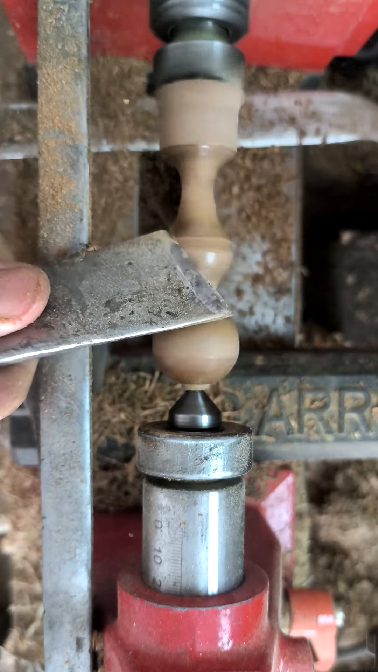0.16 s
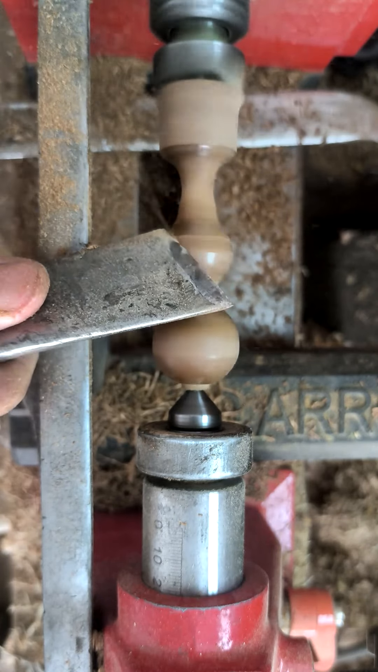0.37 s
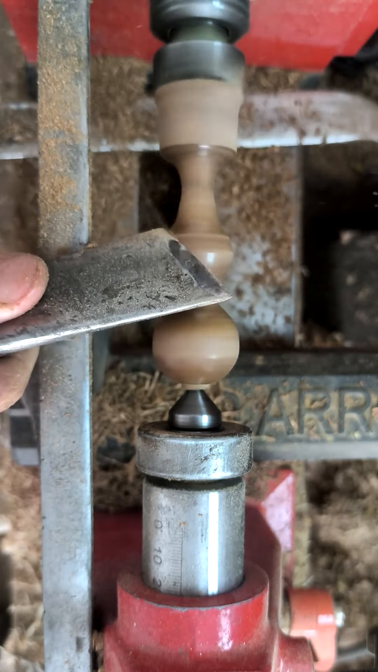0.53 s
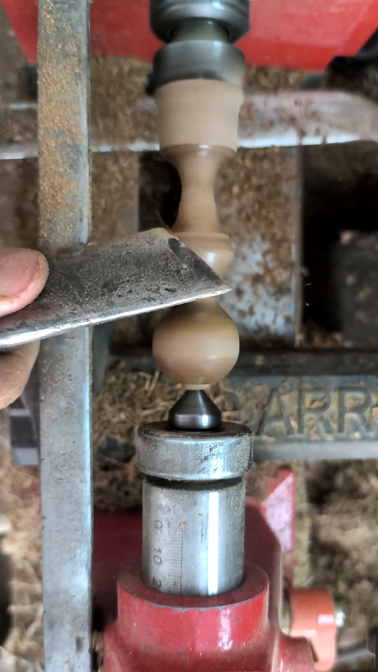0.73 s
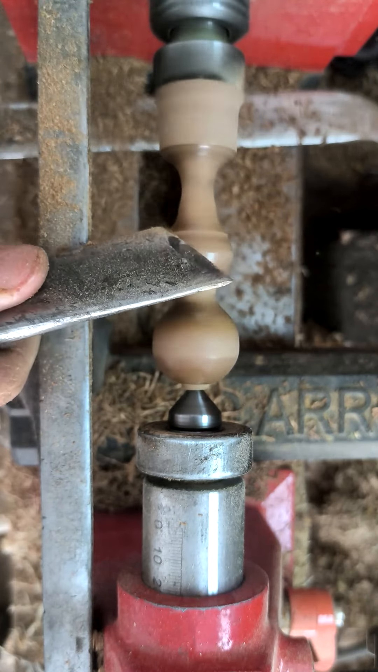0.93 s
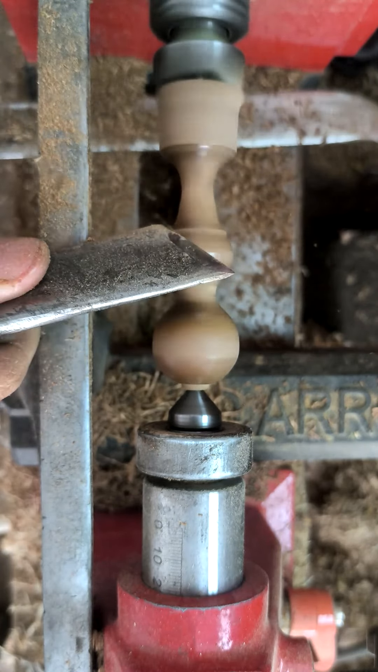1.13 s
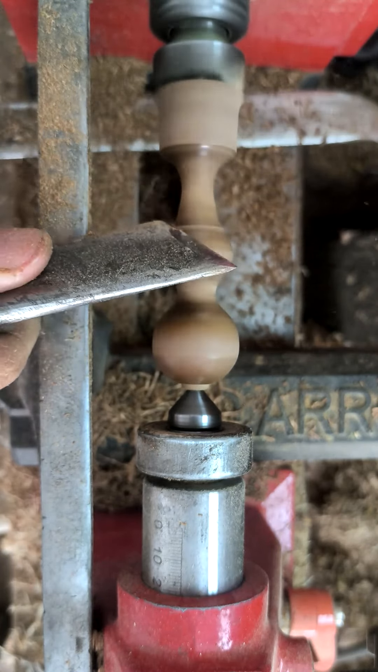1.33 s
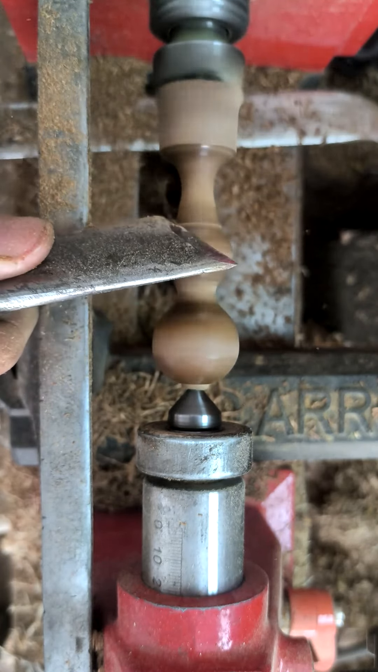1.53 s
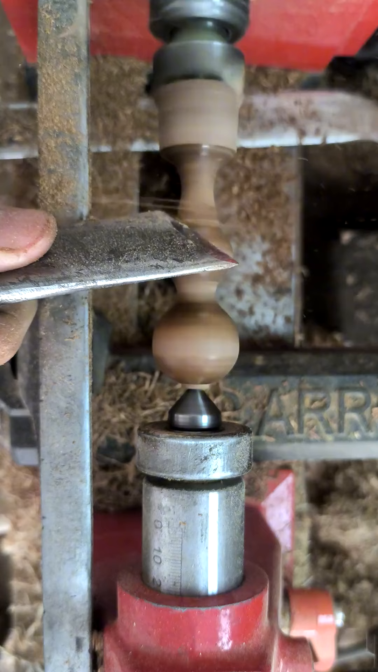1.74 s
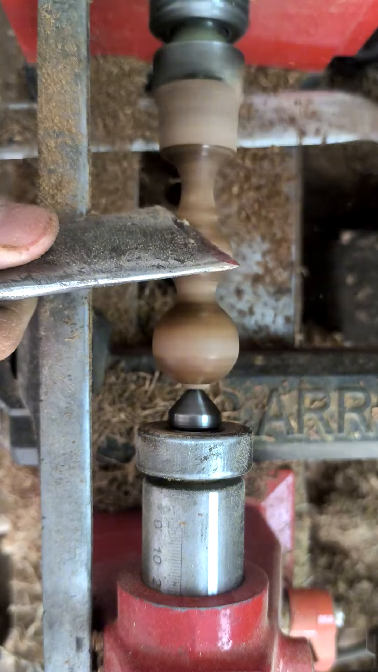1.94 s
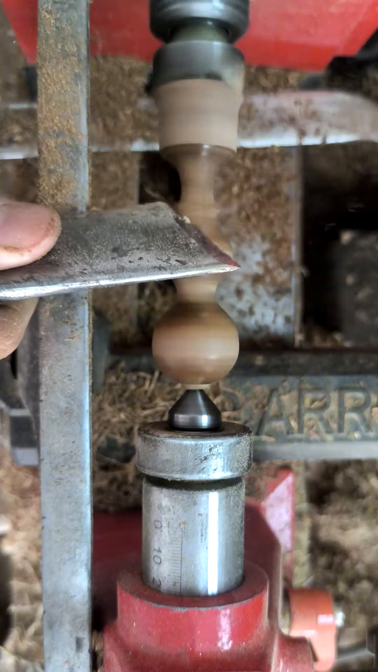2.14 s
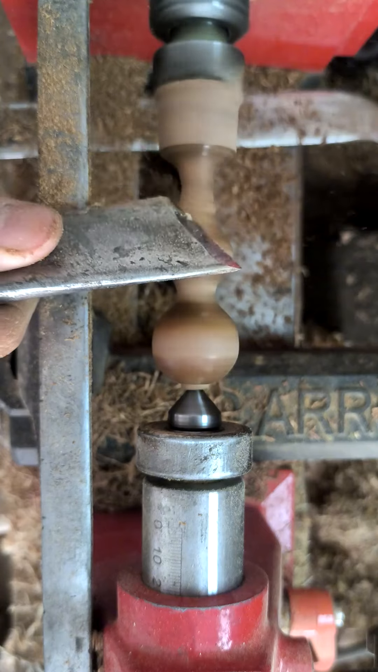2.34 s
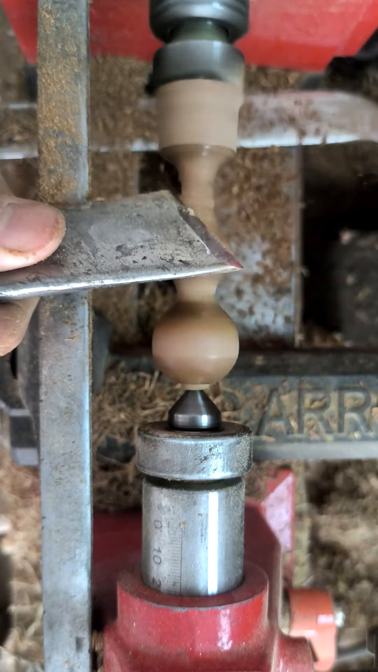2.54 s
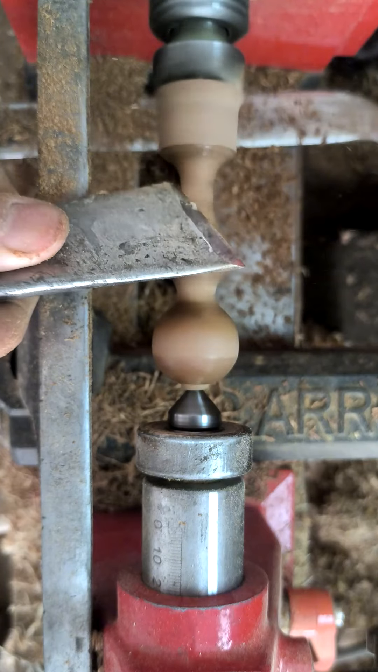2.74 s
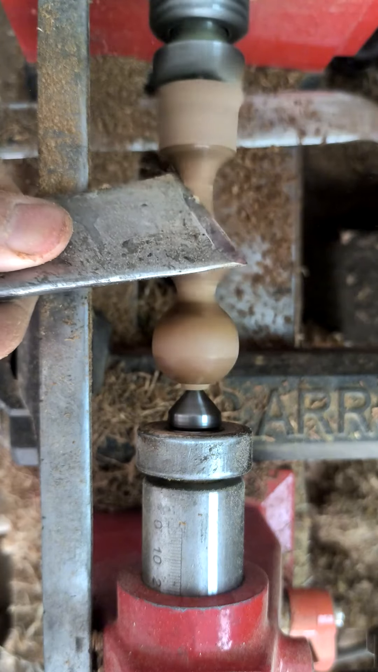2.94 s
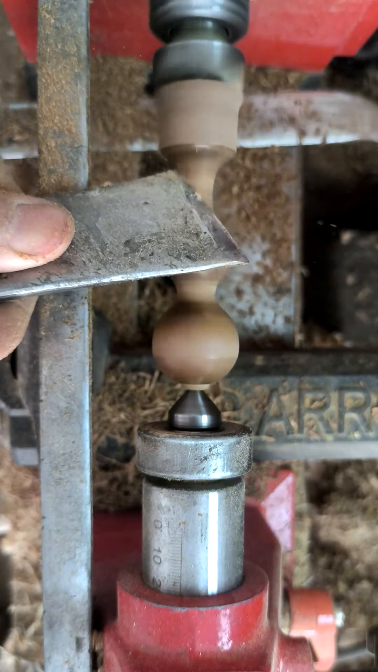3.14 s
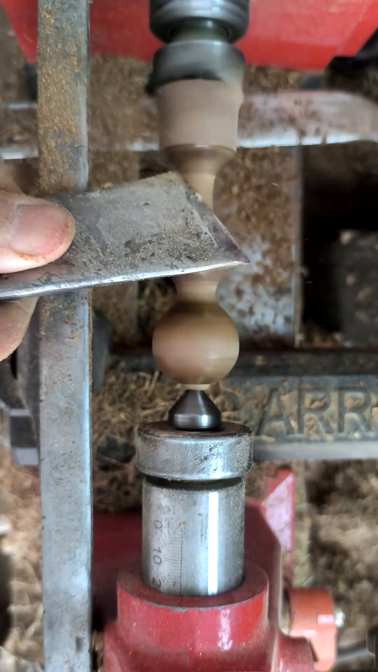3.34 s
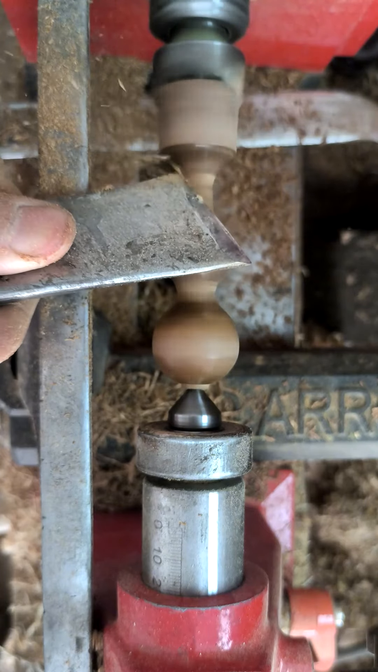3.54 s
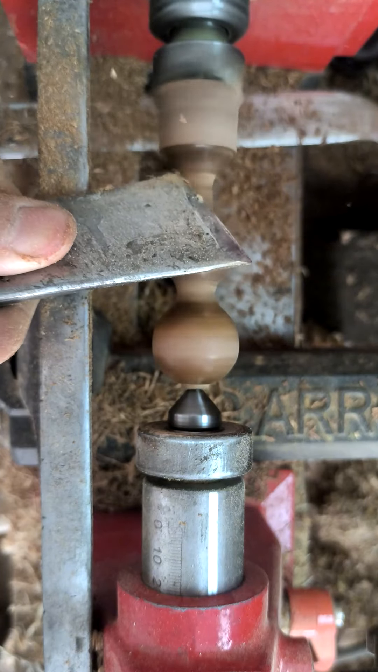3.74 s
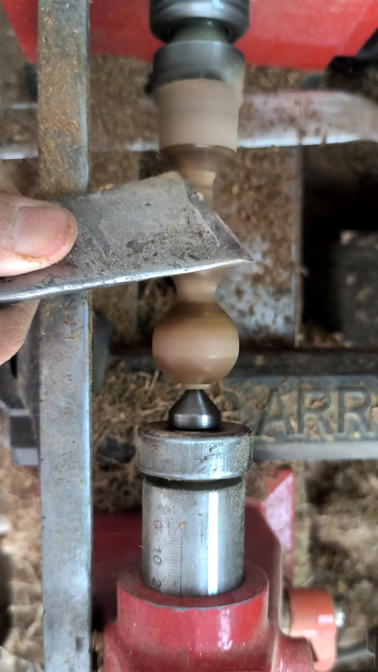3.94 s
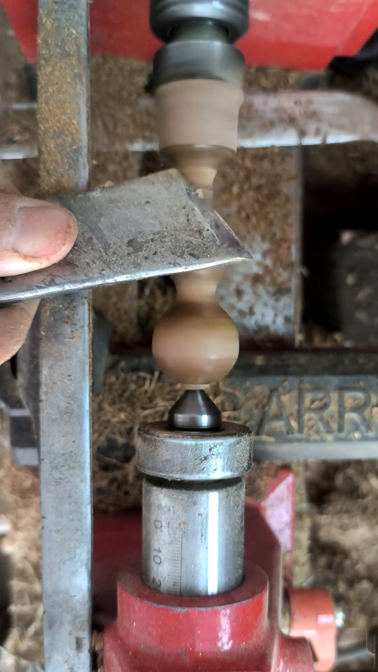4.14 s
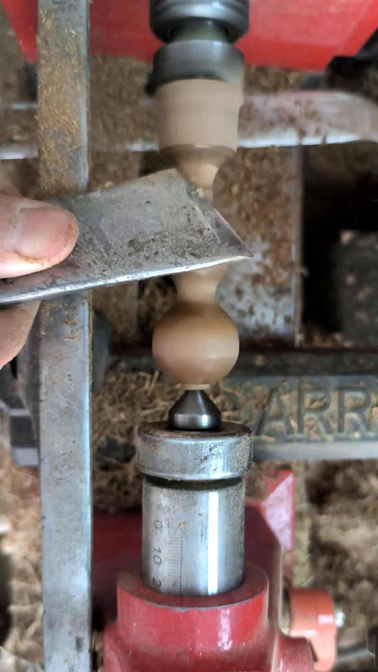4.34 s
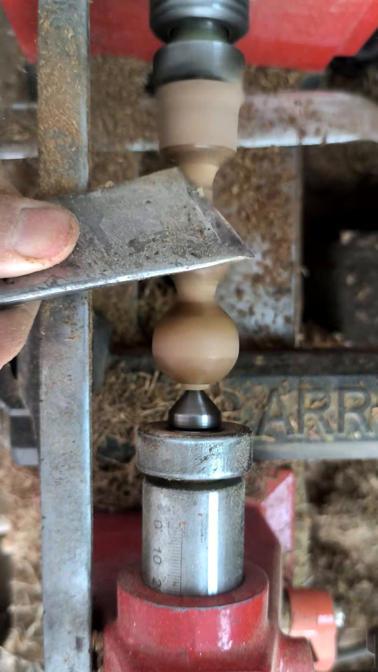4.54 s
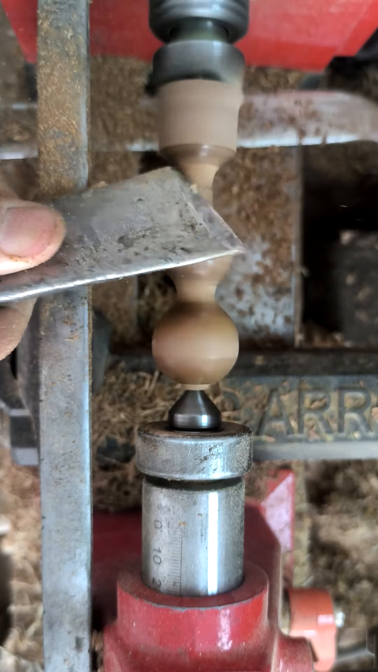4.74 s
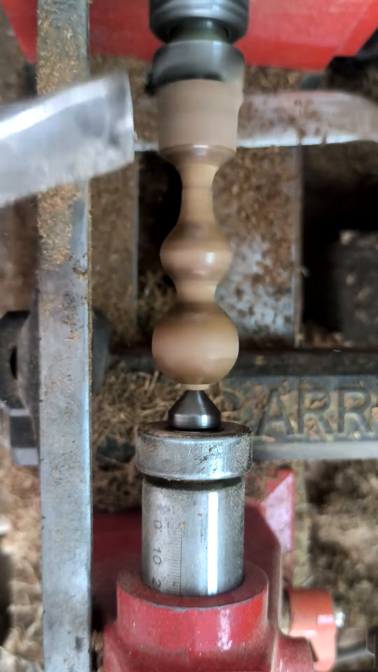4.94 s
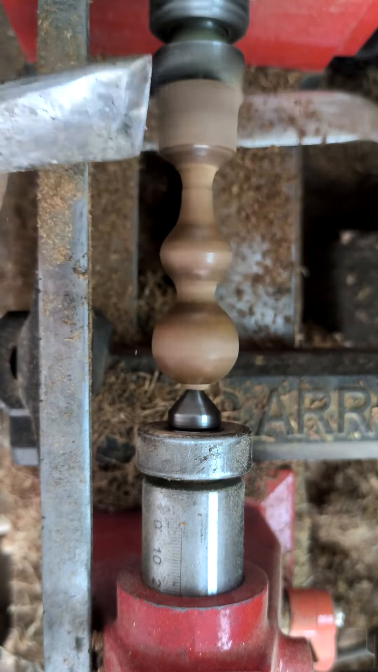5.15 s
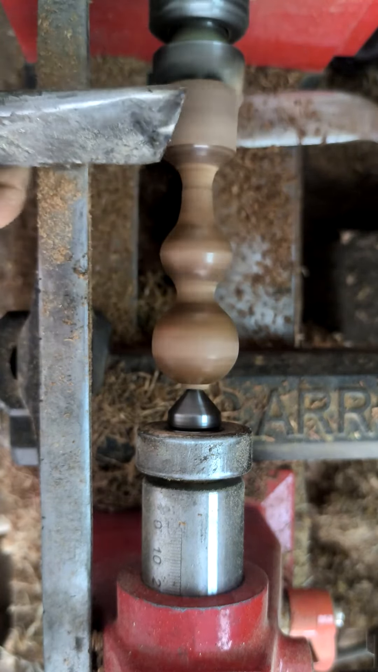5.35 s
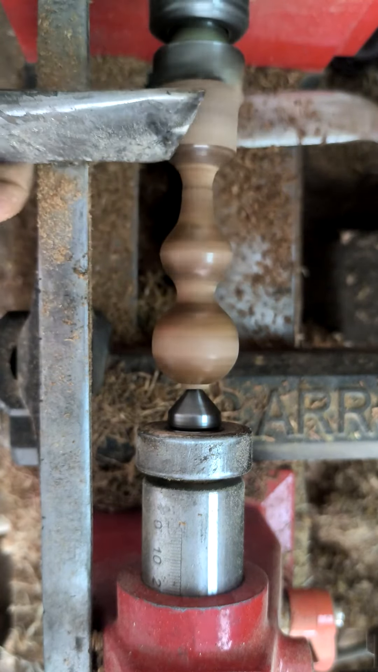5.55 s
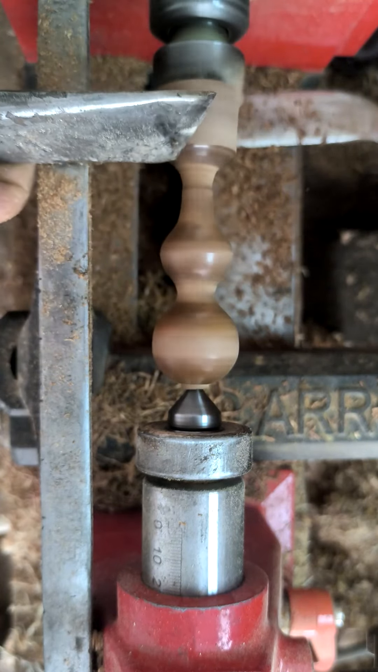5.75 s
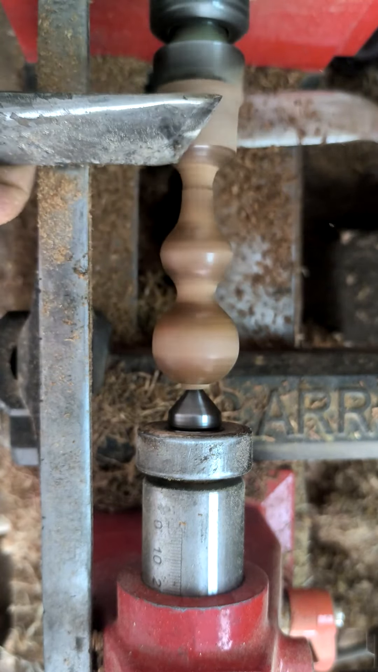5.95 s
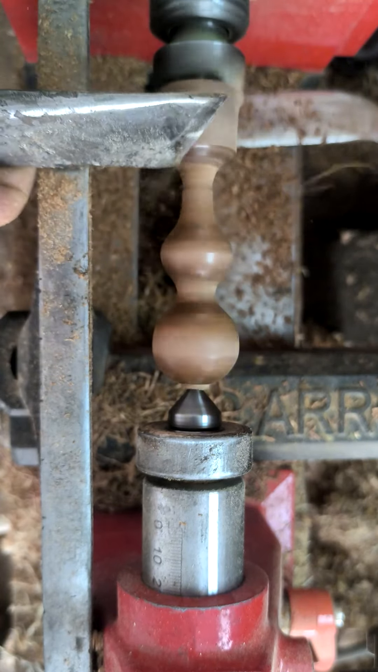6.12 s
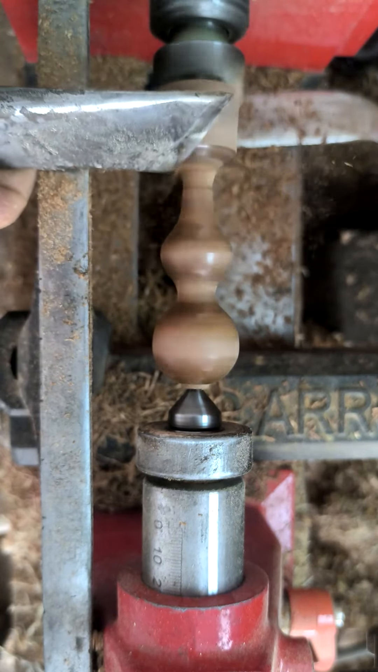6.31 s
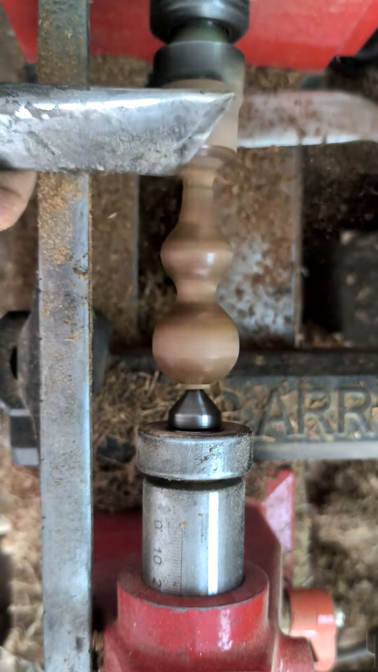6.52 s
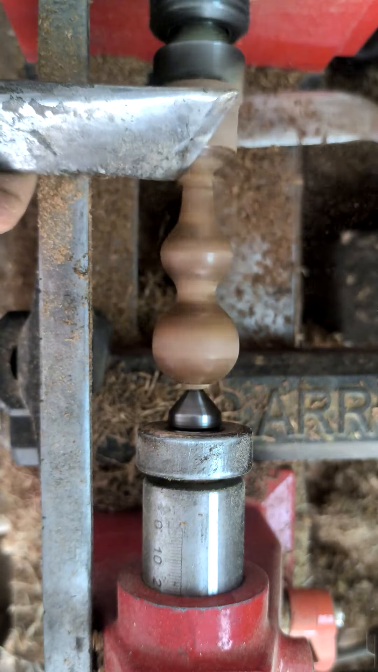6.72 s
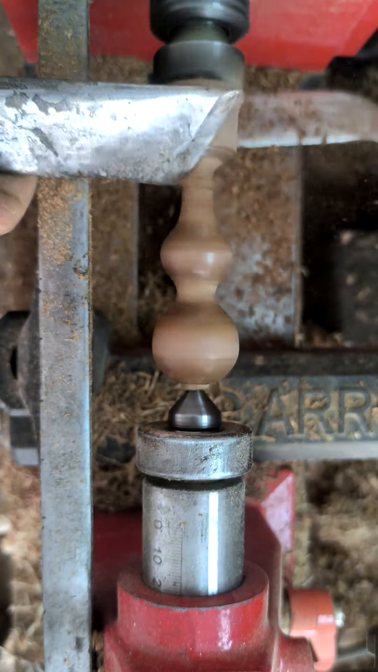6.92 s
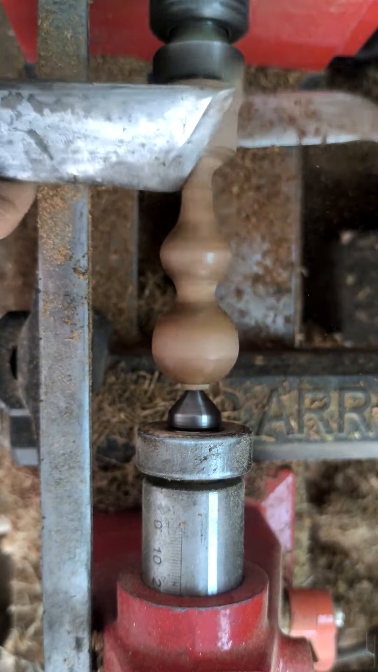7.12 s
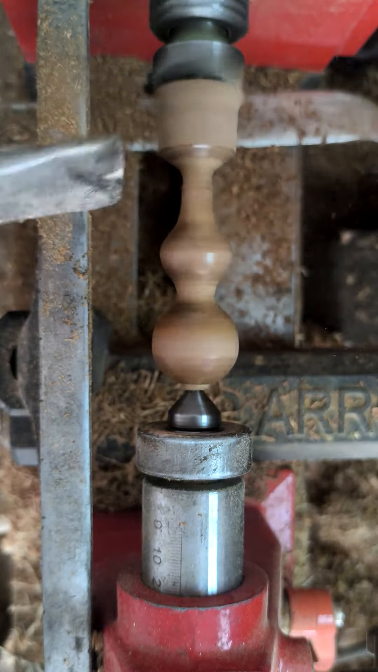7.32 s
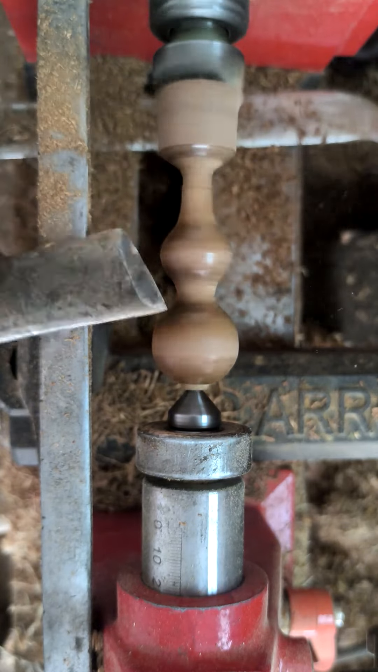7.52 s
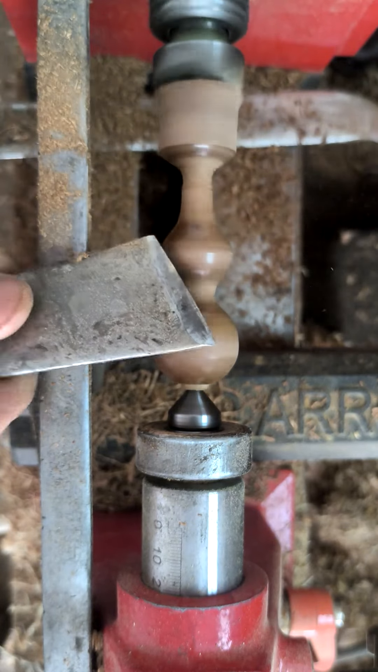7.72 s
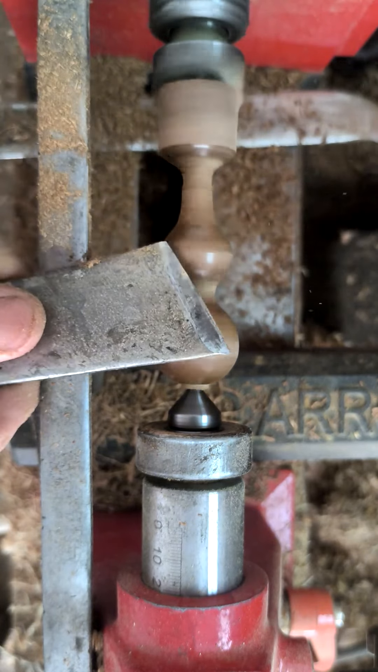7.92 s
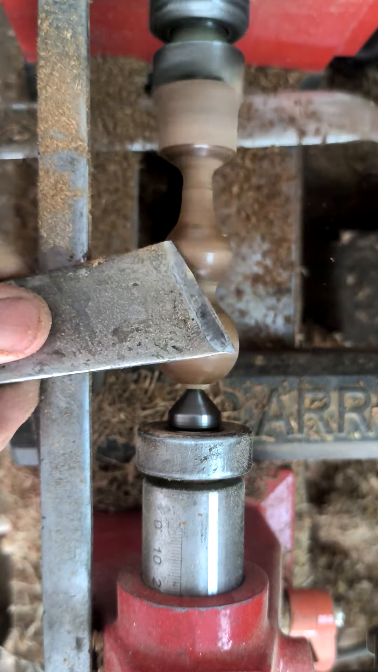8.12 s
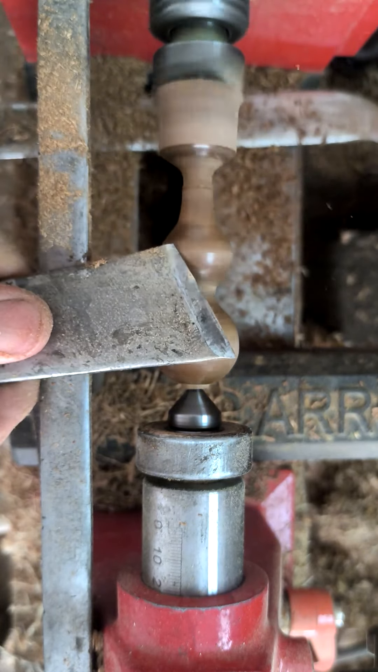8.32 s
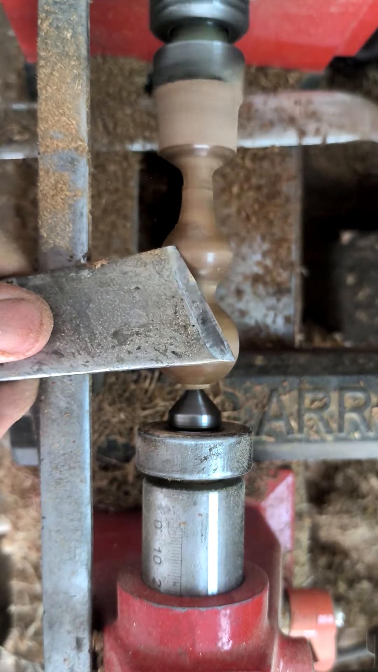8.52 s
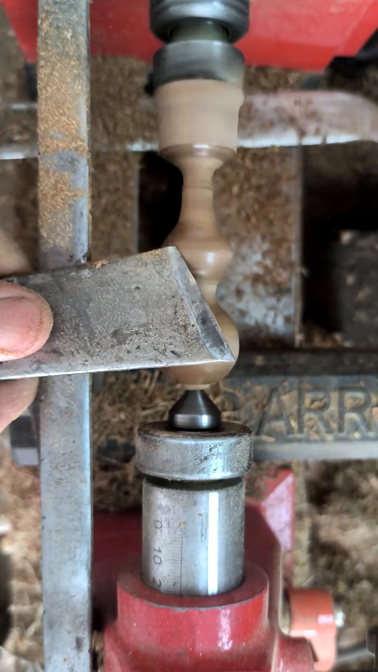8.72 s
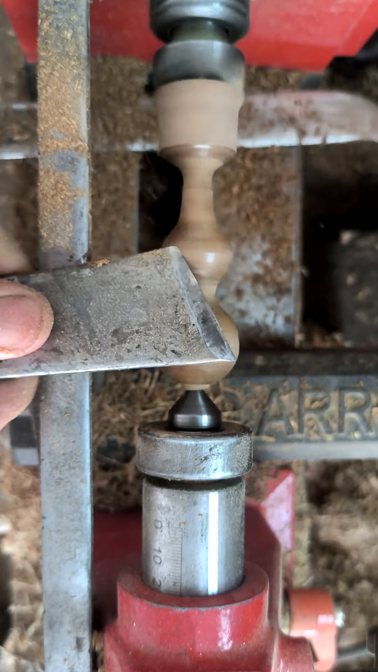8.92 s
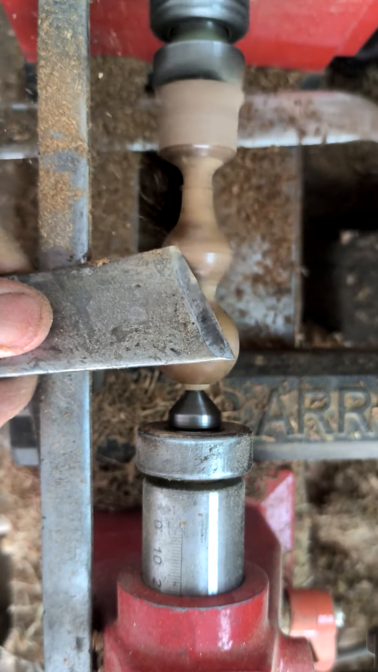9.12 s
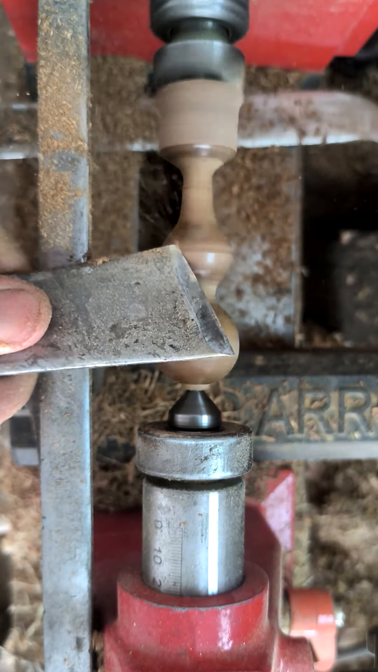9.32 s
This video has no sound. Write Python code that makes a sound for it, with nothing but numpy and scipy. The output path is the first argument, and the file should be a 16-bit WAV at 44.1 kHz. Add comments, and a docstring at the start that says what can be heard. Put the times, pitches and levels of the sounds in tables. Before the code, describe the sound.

Over a constant motor hum and thin, high bearing whirr, a steel edge rasps a small spinning piece of wood with a fast, grainy, spindle-speed buzz. Narrow friction squeals come and go, and the deepest cut stutters with a hollow boom. Pauses leave only the lathe, broken by two small clusters of metallic knocks as the tool lands. Later cuts are shorter, one swelling into a groan and squeal. Close microphones, short room tail.

```python
"""A scraper buzzes on spinning wood in seven short passes, with squeals, over the whirr of a small lathe.
Cutting sound is noise shaped by wood and blade; the same grain returns each turn, so it buzzes at spindle speed.
Friction squeals are narrow resonances or gliding tones; in the deep cut the blade chatters and the rest booms.
Motor and bearings are wavering tones and pulsed noise. Between passes the tool lands twice on the rest,
each time with a small cluster of knocks: struck resonances with a short noisy room tail."""
import sys
import numpy as np
from scipy import signal
from scipy.fft import rfft, irfft, next_fast_len
from scipy.io import wavfile
from scipy.ndimage import uniform_filter1d, map_coordinates

SR = 44100
rng = np.random.default_rng(int(sys.argv[2]) if len(sys.argv) > 2 else 0)


def generate_wav(signal):
    """Clip the signal to [-1, 1] and save it as 16-bit WAV at the path in sys.argv[1]."""
    frames = np.transpose(np.atleast_2d(signal))
    scaled = np.clip(frames, -1, 1) * 32767
    pcm = np.round(scaled).astype(np.int16)
    wavfile.write(sys.argv[1], SR, pcm)


N = 413216
FFT = next_fast_len(N, real=True)
T, HZ = np.arange(N) / SR, np.fft.rfftfreq(FFT, 1 / SR)

# broad colour of steel on wood: (frequency [Hz], relative level per Hz [dB])
SCRAPE = [(25, -24), (60, -35), (170, -20), (240, -7.5), (450, -8.5), (1000, -0.5), (1270, -11.5),
          (1600, 2), (2300, 2), (3400, 3.5), (5500, -2), (7100, -8.5), (9700, -8.5), (12500, -17.5),
          (15000, -18), (15800, -41)]
# blade resonances as held in the deep cut: (frequency [Hz], width [Hz], lift at full strength [dB])
HELD_DEEP = [(720, 44, -8), (975, 23, 6.5), (1560, 160, 9.5), (1920, 82, 5), (2210, 110, -12),
             (2508, 110, 13.5), (2720, 45, 8), (3280, 70, 8), (3757, 62, 19), (5230, 200, 10),
             (5930, 180, 8.5), (6350, 130, 10.5), (7560, 120, 7)]
# the hand in the deep cut: (time [s], pressure on the edge [dB], level of the dust fizz [dB])
DEEP = [(3.54, -39.5, -46.5), (3.894, -36.5, -40.5), (3.914, -35.5, -44.5), (4.018, -34, -41),
        (4.19, -39, -46), (4.236, -36.5, -42), (4.34, -35.5, -45), (4.354, -38, -36.5), (4.56, -36.5, -44),
        (4.692, -38, -37.5), (4.71, -38.5, -45)]
# how alike the two microphones hear: (frequency [Hz], likeness [-1 to 1])
LIKENESS = [(50, .85), (150, .99), (350, .987), (470, .75), (650, .4), (900, .1), (1700, .1), (2800, .55),
            (4500, .5), (8000, .1), (14000, .5)]
# balance of the two microphones: (frequency [Hz], left minus right [dB])
LEAN = [(250, -0.5), (800, -0.5), (1200, 1), (1800, 4.5), (2500, 2), (3200, -0.5), (4200, 3), (7000, -1),
        (9000, 1), (12000, -1.5), (12600, 11), (15500, 9)]
FIRM_DB = -39  # a firm pressure; layer levels are stated for it and grow with pressure


def amp(db):
    """Turn decibels into a gain."""
    return 10 ** (np.asarray(db) / 20)


def unit(x):
    """Scale to an average (RMS) size of 1."""
    return x / np.sqrt(np.mean(x ** 2) + 1e-20)


def read(points):
    """Read a spectrum table on the frequency grid, joining points evenly in log frequency."""
    hz, value = np.transpose(points)
    return np.interp(np.log(HZ + 1), np.log(hz + 1), value)


SAME, TILT = np.clip(read(LIKENESS), -1, 1), amp(read(LEAN) / 2)


def wave(spectrum):
    """Turn a spectrum back into sound."""
    return irfft(spectrum, FFT)[..., :N]


def drift(rate):
    """Random wandering of size 1, with this many fresh values a second."""
    knots = rng.standard_normal(4000)
    return unit(np.interp(T * rate, np.arange(len(knots)), knots))


def bell(s, half):
    """A smooth swell of height 1 around a moment."""
    return np.exp(-np.minimum(((T - s) / half) ** 2, 30))


def panned(lean_db):
    """Left and right gains that keep the total power."""
    gains = np.array([amp(lean_db / 2), amp(-lean_db / 2)]).reshape(2, -1)
    return gains / np.sqrt((gains ** 2).mean(0))


def ringing(modes):
    """Complex response of a set of damped resonances, alternating in sign."""
    response = 0
    for k, (hz, width, db) in enumerate(modes):
        mode = 1j * HZ * width / (hz ** 2 - HZ ** 2 + 1j * HZ * width)
        response = response + amp(db) * mode * (-1) ** k
    return response


def lifts(modes):
    """Gain of resonant humps and dips on a broad spectrum."""
    return amp(sum(db / (1 + (2 * (HZ - hz) / width) ** 2) for hz, width, db in modes))


def ports(pair):
    """Spectra at two microphones, whose likeness and balance depend on frequency."""
    mid, side = rfft(pair, FFT) * np.sqrt([(1 + SAME) / 2, (1 - SAME) / 2])
    return np.array([(mid + side) * TILT, (mid - side) / TILT])


def sound(spectra, gain):
    """Filtered stereo sound whose middle has size 1."""
    x = wave(spectra * gain)
    return x / x.mean(0).std()


def steadied(x, seconds):
    """The hand damps a growing vibration: dividing by its running size holds it steady."""
    power = uniform_filter1d((x ** 2).mean(0), round(seconds * SR))
    return x / np.sqrt(abs(power) + 1e-6)


def spindle_turns():
    """Turns made since the start, adding up the changing spindle speed."""
    # spindle speed: (time [s], speed [turns per second])
    speed = [(0, 44.28), (.4, 44.28), (.7, 44.38), (1.9, 44.42), (2.7, 44.5), (3.4, 44.2), (4.3, 44.38),
             (5.3, 44.0), (6.1, 44.25), (6.5, 44.44), (7.05, 44.42), (7.8, 44.0), (8.5, 44.3),
             (8.85, 44.05), (9.37, 44.3)]
    return np.cumsum(np.interp(T, *np.transpose(speed))) / SR


def bites(cycles, depth_db):
    """The edge digs in once in every cycle, so the level pulses."""
    return unit(amp(depth_db * (.5 + .5 * np.cos(2 * np.pi * cycles)) ** 2))


def contact(start, end):
    """Gain of the edge meeting the wood at start and leaving it at end."""
    def settled(s):
        return 1 - np.exp(-np.maximum(T - s, 0) / 0.03)  # it takes hold and lets go within about 0.03 s
    return abs(settled(start) - settled(end))


def stroke(rows):
    """One pass of the hand: contact gain, pressure above firm in dB, fizz in dB."""
    s, pressure_db, fizz_db = np.transpose(rows)
    return contact(s[0], s[-1]), np.interp(T, s, pressure_db) - FIRM_DB, np.interp(T, s, fizz_db)


def digging():
    """Swell in dB as the blade digs in and comes free; each sound takes all or a share of it."""
    # moments when the blade digs in or eases: (time [s], half length [s], full swell [dB])
    digs = [(1.25, 0.45, 9), (2.263, 0.13, 12), (3.574, 0.024, 9), (3.682, 0.056, 10), (3.693, .009, -16),
            (3.736, .009, -10), (3.816, 0.085, 9), (3.865, .012, -8), (3.94, .012, -11), (4.043, 0.076, 12),
            (4.338, 0.0077, 7.5), (4.415, 0.056, 13), (4.534, 0.067, 8), (4.557, .013, -12),
            (4.633, .012, -9), (4.68, 0.068, 7), (6.825, 0.035, -1)]
    return sum(db * bell(s, half) for s, half, db in digs)


def machine(tones_db=0.5, whirr_db=-53, air_db=-49.5, wander=0.000828, flutter=0.23, sway_size=0.43):
    """Motor tones waver; rolling balls pulse the high tones and a whirr, which throb with cage and motor."""
    # steady tones of motor and bearings, the high ones in clusters spaced by the turning of the cage:
    # (frequency [Hz], level before the common tones_db [dB], left minus right [dB])
    tone_rows = [(199.3, -67.0, -1), (230.5, -64.5, 0), (261.1, -54.5, 1), (345.1, -70.0, 1),
                 (391.1, -62.5, 1), (525.5, -72.5, 0), (586.9, -70.5, -8), (775.9, -70.5, 7),
                 (785.6, -64.5, 6), (799.9, -73.0, -4), (976.2, -73.0, 10), (1064.5, -71.5, 5),
                 (1190.3, -75.0, -4), (1324.7, -71.0, -7), (1521.1, -69.5, 8), (1582.4, -66.0, 4),
                 (1609.2, -69.5, 7), (1689.3, -62.5, 5), (1715.3, -57.5, 6), (1745.0, -61.0, -1),
                 (1759.4, -63.5, 6), (1778.1, -62.0, 7), (1804.5, -59.5, 9), (1830.5, -66.5, 3),
                 (1912.2, -55.0, 8), (1939.9, -57.5, 5), (1972.2, -59.5, 3), (2000.4, -59.5, 0),
                 (2106.1, -68.0, 9), (2499.1, -70.5, 11), (2527.0, -68.0, 0), (2585.0, -68.0, 0),
                 (2696.1, -57.5, 15), (2723.1, -60.0, -3), (2750.7, -61.5, 13), (2782.4, -63.5, -6),
                 (2890.8, -64.0, 8), (2918.9, -55.5, -12), (2947.4, -63.0, 7), (2976.1, -65.5, -8),
                 (3005.1, -65.0, 4), (3059.1, -63.5, -5), (3086.4, -56.0, 4), (3114.4, -54.5, -9),
                 (3148.1, -58.5, -2), (3173.3, -61.0, -8), (3283.9, -61.5, 0), (3310.5, -63.0, -3),
                 (3477.5, -68.0, -2), (3506.1, -69.0, -14), (3566.8, -67.5, -4), (4317.7, -70.5, -3)]
    # bearing whirr: (frequency [Hz], relative level per Hz [dB])
    whirr_colour = [(1200, -43), (1500, -9.5), (1720, -4.5), (1960, 1.5), (2150, -13), (2400, -18),
                    (2750, -2.5), (3150, 0.5), (3400, -7.5), (3800, -19), (4350, -8), (5200, -30.5)]
    # air noise: (frequency [Hz], relative level per Hz [dB])
    air_colour = [(25, -32), (50, -17.5), (100, 2.5), (160, -1.5), (205, 3.5), (260, 9.5), (330, -3),
                  (540, -1.5), (950, -6.5), (1300, -4.5), (2050, -4), (2280, -11), (2600, -4), (3550, -2),
                  (3850, -7.5), (4200, -4), (5000, -4.5), (7000, -12), (13500, -13.5), (15000, -5.5)]
    cage_hz, motor_hz, ball_pass_hz = 27.93, 60.7, 195.5
    clock = T + np.cumsum(wander * drift(5)) / SR  # time that runs slightly unevenly
    cage, motor, balls = (np.cos(2 * np.pi * (hz * clock + rng.random()))
                          for hz in (cage_hz, motor_hz, ball_pass_hz))
    throb = unit((1 + .12 * cage) * (1 + .2 * motor))
    rolling = unit(amp(9 * balls))
    ringing_load = throb * unit(1 + .25 * balls)
    tones = np.zeros((2, N))
    sway, swell = sway_size * drift(14), unit(1 + flutter * drift(13))
    for hz, db, lean_db in tone_rows:
        # the less alike the microphones are here, the further apart their phases
        apart = np.arccos(SAME[np.searchsorted(HZ, hz)]) * rng.choice([-.5, .5])
        bearing = hz > whirr_colour[0][0]  # the high tones come from the bearings
        phase = np.float32(2 * np.pi * ((hz * clock + rng.random()) % 1) + (0 if bearing else sway))
        size = np.sqrt(2) * amp(db + tones_db) / np.cos(apart) * panned(lean_db)
        pulsing = ringing_load if bearing else swell
        tones += size * np.cos(phase + np.float32([[apart], [-apart]])) * pulsing
    whirr = sound(ports(throb * rolling * rng.standard_normal((2, N))), amp(read(whirr_colour)))
    air = sound(ports(rng.standard_normal((2, N))), amp(read(air_colour)))
    return tones + amp(whirr_db) * whirr + amp(air_db) * air


def frame_hum(strokes, flutter=0.12, dig_share=0.42, growth=0.36, waver_db=2.2):
    """Some multiples of the spindle speed meet frame resonances, so the frame drones and hums under load."""
    # hum frequencies as multiples of the spindle speed: (first [times], second [times])
    hum_orders = (10, 12)
    # hum at firm pressure, a row a pass: (first multiple [dB], second multiple [dB])
    hums = [(-70, -55), (-57, -63.5), (-59, -62), (-62, -60), (-67, -60), (-63, -56), (-80, -57.5)]
    # low drone under load, which beats against the motor: (time [s], level [dB])
    drone_curve = [(0, -47), (.25, -57), (.5, -48), (.8, -53), (1.05, -49.5), (1.22, -43), (1.85, -48),
                   (2.02, -55), (2.15, -47.5), (2.5, -45.5), (2.65, -53), (2.85, -46), (3.05, -58.5),
                   (3.3, -53), (3.5, -49), (5.7, -56.5), (7.05, -44.5), (8.45, -54), (9, -63)]
    drone_order = 6
    loads = np.array([touch * amp(growth * pressure) for touch, pressure, _ in strokes])
    loads = loads * amp(dig_share * digging())
    touching = sum(touch for touch, _, _ in strokes)
    drone = amp(np.interp(T, *np.transpose(drone_curve))) * touching
    out = np.zeros(N)
    for order, gain in zip((drone_order, *hum_orders), (drone, *(amp(hums).T @ loads))):
        phase = 2 * np.pi * order * spindle_turns() + flutter * drift(22)
        waver = (1 + flutter * drift(22)) * amp(waver_db * drift(8.7))
        out += gain * unit(np.sin(phase) * waver)
    return out


def grain(memory, fresh, twice=0):
    """Wood passes the edge once a turn, end grain twice; it is slowly cut away and torn fibres add noise."""
    keep, fresh = np.exp(-1 / memory), np.clip(fresh, 0, 1)  # memory is in turns
    noise = rng.standard_normal((2, 560, 1024))  # 560 turns of 1024 points around the wood
    surface = signal.lfilter([1], [1, -keep], noise, axis=1)[:, 100:]  # drop the first turns, still settling
    surface = surface + twice * np.roll(surface, surface.shape[2] // 2, axis=2)
    place = spindle_turns() * surface.shape[2]
    felt = np.array([map_coordinates(s.ravel(), [place], order=2) for s in surface])
    return np.sqrt(1 - fresh) * unit(felt) + np.sqrt(fresh) * rng.standard_normal((2, N))


def cutting(strokes, bounces, body_db=-1, rasp_db=-2, fizz_db=0,
            chatter_db=6.0, runout_db=2.0, ball_runout_db=-1.0):
    """Each pass plays the grain through the wood, the blade and the spray of dust."""
    # resonances of lathe and workpiece in every pass: (frequency [Hz], width [Hz], lift [dB])
    frame = [(295, 59, 14.5), (735.5, 25, -42), (739.5, 168, 13), (1864, 490, 7.5), (3090, 230, 4),
             (8810, 140, -41)]
    # blade resonances, which depend on how it is held: (frequency [Hz], width [Hz], lift [dB])
    held_bead = [(446, 300, -20.5), (553, 11, 4), (913, 200, -11.5), (2147, 92, 7.5), (2610, 81, 8),
                 (3105, 52, 11.5), (3930, 120, 6.5), (5730, 230, 5.5), (7640, 220, 2.5),
                 (12500, 4000, -5.5)]
    held_light = [(458, 16, 7), (1990, 290, 4), (2290, 130, -2), (2587, 106, 11), (3115, 57, 7),
                  (3720, 130, 8.5), (5050, 200, 8), (7260, 170, -2), (8200, 180, -11), (8390, 92, 12)]
    held_steep = [(433, 54, 13), (624, 94, -3.5), (900, 370, 1.5), (1559, 41, 13.5), (1720, 68, 2),
                  (2454, 260, 14), (3680, 1430, 12), (5200, 500, 4), (5620, 1150, 9), (6340, 46, 15),
                  (7750, 280, 7)]
    held_soft = [(530, 29, -2), (1530, 67, 18.5), (1940, 120, 12.5), (2480, 140, 8), (3750, 170, 14.5),
                 (6630, 500, 13.5), (8450, 500, 8)]
    held_ball = [(467, 84, -32), (522, 22, 13), (1910, 200, -4), (2180, 66, 2), (2510, 61, 8),
                 (2830, 97, -18), (3670, 300, 1), (5700, 400, 3), (7060, 300, -6), (7500, 200, 6)]
    # levels at firm pressure before the common trims, a row a pass: (wood body [dB], edge rasp [dB])
    cuts = [(-48, -35), (-44.5, -33), (-47, -37), (-49, -37.5), (-42.5, -38), (-43.5, -33.5), (-51.5, -38)]
    # the blade's angle throws a band to one side, a row a pass: (from [Hz], to [Hz], left minus right [dB])
    throws = [(3950, 8000, 1.5), (3900, 11000, 2), (3210, 5000, 1), (6330, 8000, 8), (1400, 4800, -3.5),
              (6200, 7300, 11), (3300, 4700, -10)]
    body_growth, rasp_growth, dig_share = 0.7, 0.84, 0.37  # dB per dB of pressure, twice; share of the swell
    body, fizz = ports(grain(11.7, 0.22, twice=0.26)), ports(grain(1.9, 0.97))
    # a smooth surface repeats turn after turn; a tearing cut renews it quickly
    smooth, torn = ports(grain(25, .18)), ports(grain(10, .5))
    # soft crossovers split the sound into body, rasp and fizz
    above_body, above_rasp = 1 - 1 / (1 + (HZ / 1400) ** 8), 1 - 1 / (1 + (HZ / 7200) ** 8)
    layers = [(1 - above_body, body_db), (above_body - above_rasp, rasp_db), (above_rasp, fizz_db)]
    bands = [(350, 1300), (2200, 6500), (9000, 14000)]  # Hz, where each layer's level is set
    # the piece runs slightly out of true, with a separate pulse depth at the ball
    wobble, ball_wobble = bites(spindle_turns(), runout_db), bites(spindle_turns(), ball_runout_db)
    passes = [(held_bead, smooth, wobble),
              (held_light, smooth + torn, wobble),  # cove
              (held_light, smooth - torn, wobble),  # flank
              (HELD_DEEP, torn, bites(bounces, chatter_db)),
              (held_steep, smooth + torn, wobble),  # shoulder
              (held_soft, smooth, wobble),  # touch
              (held_ball, smooth, ball_wobble)]
    base, out = amp(read(SCRAPE)) * lifts(frame), np.zeros((2, N))
    dig_db = dig_share * digging()
    for (touch, pressure, dust_db), cut, throw, (blade, rasp, bite) in zip(strokes, cuts, throws, passes):
        body_level_db = cut[0] + body_growth * pressure + dig_db
        rasp_level_db = cut[1] + rasp_growth * pressure
        levels_db = [body_level_db, rasp_level_db, dust_db]
        thrown = (HZ > throw[0]) & (HZ < throw[1])
        shape = base * lifts(blade) * panned(throw[2] * thrown)
        for drive, (share, db), (lo, hi), level_db in zip([body, rasp, fizz], layers, bands, levels_db):
            in_band = (HZ > lo) & (HZ < hi)
            size = np.linalg.norm((drive * shape).mean(0)[in_band]) * np.sqrt(2 / (N * FFT))
            layer = wave(drive * shape * np.sqrt(abs(share))) / size
            out += layer * amp(db + level_db) * touch * bite
    return out


def blade_song(strokes, steady_s=0.14):
    """Narrow blade resonances swell when the edge is pressed in."""
    # blade resonances: (frequency [Hz], nominal width [Hz], growth [dB per dB of pressure])
    blade = [(2630, 63, 0.2), (3772, 43, 3.5), (5120, 110, 4.5), (8370, 85, 3.5)]
    # strength at firm pressure, a row a pass: (one column for each blade resonance in turn [dB])
    songs = [(-52, -50, -57, -46), (-43.5, -40, -62, -59), (-62, -49.5, -58, -73), (-55, -58.5, -64, -65),
             (-51.5, -63, -60, -64), (-62, -57, -58, -49), (-51, -50, -56, -59)]
    drive, out = ports(grain(25, .15)), np.zeros((2, N))
    shares = np.array([touch for touch, _, _ in strokes]) ** 2
    pressure = sum(touch ** 2 * push for touch, push, _ in strokes)
    for k, (hz, width, growth) in enumerate(blade):
        # passing the resonance twice narrows it, so each one starts doubly wide
        song = steadied(sound(drive, ringing([(hz, 2 * width, 0)]) ** 2), steady_s)
        strength = np.sqrt(amp(songs)[:, k] ** 2 @ shares)
        out += strength * amp(growth * pressure) * song
    return out


def squeals(strokes, bounces, steady_s=0.0056, spread=0.4):
    """Friction feeds one resonance for a moment, pulsing once in each turn or bounce."""
    # the blade catches and one resonance swells, pulsing with turns (with bounces in the deep cut):
    # (time [s], half length [s], frequency [Hz], width of each of two filters [Hz], level [dB],
    #  depth of the pulsing [dB], moment of the cycle [0-1], left minus right [dB])
    squeal_rows = [(.09, 0.1, 3780, 150, -40, 7, 0.6, -8), (.07, .09, 4470, 280, -47, 3, .6, 4),
                   (0.092, 0.14, 6250, 320, -47, 3, 0.5, 4), (0.44, 0.44, 3112, 19, -48, -1, 0.3, -10),
                   (.9, .05, 3780, 37, -44.5, -2, 0.3, -12), (1.6, 0.46, 2626, 70, -43, 0, .61, -1),
                   (1.47, 0.048, 1540, 90, -45.5, 3, 0.7, 5), (2.29, 0.075, 2594, 41, -35, 0, 0.95, 2),
                   (2.531, 0.053, 2620, 50, -39, 7, .6, -1), (2.672, 0.036, 1860, 220, -35.5, 7, 0.1, 10),
                   (2.792, .055, 1935, 130, -31, 11, 0.23, 16), (2.75, 0.23, 5120, 72, -39, 8, 0.26, 10),
                   (2.6, .08, 4900, 220, -44, 11, .45, 8), (3.28, 0.32, 5750, 630, -46.5, -3, 0.3, 8),
                   (3.29, 0.047, 1780, 250, -36.5, 1, .3, 11), (3.856, 0.052, 1840, 300, -32.5, 0, 0.3, 16),
                   (3.7, .06, 3780, 70, -43, 4, 0.5, 8), (4.266, .06, 2820, 330, -37.5, 4, 0.2, 6),
                   (4.234, 0.055, 2560, 240, -39, 4, 0.5, 3), (4.454, .06, 3772, 70, -44, 4, 0.6, 8),
                   (5.882, 0.2, 2470, 160, -46, 0, 0.4, -13), (6.263, 0.16, 2660, 330, -43, 3, 0.3, -8),
                   (6.92, 0.14, 4620, 680, -41.5, 2, .6, -4), (8.948, .025, 3820, 50, -39, 15, 0.9, -2),
                   (9.085, 0.09, 3830, 48, -38, 15, .99, 0), (9.26, .11, 3825, 45, -44.5, 20, 0.04, -5),
                   (9.1, .09, 2514, 46, -40, 22, 0.54, 10), (9.09, 0.066, 5450, 200, -48, 12, .4, 0),
                   (9.26, 0.074, 2500, 50, -45, 20, 0.6, 7), (9.32, .07, 1980, 110, -44, -5, .43, 1)]
    mid, side = rng.standard_normal((2, N))
    friction = np.array([mid + spread * side, mid - spread * side])
    out, turns = np.zeros((2, N)), spindle_turns()
    for s, half, hz, width, db, pulse_db, moment, lean_db in squeal_rows:
        near = slice(*np.searchsorted(T, [s - 3 * half, s + 3 * half]))
        b, a = signal.iirpeak(hz, hz / width, fs=SR)
        once = signal.lfilter(b, a, friction[:, near])
        ring = steadied(unit(signal.lfilter(b, a, once)), steady_s)
        cycles = bounces if DEEP[0][0] < s < DEEP[-1][0] else turns
        pulse = unit(amp(pulse_db / 2 * np.cos(2 * np.pi * (cycles[near] - moment))))
        swell = np.exp(-((T[near] - s) / half) ** 2)
        out[:, near] += amp(db) * swell * pulse * ring * panned(lean_db)
    return out * sum(touch for touch, _, _ in strokes)


def chatter(bounces, squeak_db=-45, depth_db=15, uneven=0.24, snag_db=-9, thud_db=-24, lean_db=7):
    """Each bounce of the blade squeaks in a high resonance; snagged fibres snap and jolt the lathe."""
    # fibres snag and snap in the deep cut: (time [s], strength before the common snag_db [dB])
    snags = [(3.656, -20), (3.752, -22), (3.8, -19.5), (3.872, -21), (4.002, -21), (4.015, -18),
             (4.028, -17), (4.0643, -15), (4.4436, -16), (4.644, -22)]
    # the squeak starts ahead of the deep cut and builds to a steady level
    from_s, full_s, build_db_per_s, dig_share = 2.5, 4.15, 8.5, 0.54
    squeak = sound(ports(rng.standard_normal((2, N))), ringing([(7670, 180, 0)]) ** 2)
    squeak = panned(lean_db) * squeak * bites(bounces, depth_db) * (1 + uneven * drift(70))
    build_db = build_db_per_s * np.minimum(T - full_s, 0) + dig_share * digging()
    squeak = amp(squeak_db + build_db) * contact(from_s, DEEP[-1][0]) * squeak
    # each snap starts at once and dies away in milliseconds
    snaps = sum(amp(db + snag_db) * (T >= s) * np.exp(-abs(T - s) / .003) for s, db in snags)
    tearing_colour = amp(read(SCRAPE)) * lifts(HELD_DEEP) ** .5 * HZ / (HZ + 5000)
    tearing = sound(ports(rng.standard_normal((2, N))), tearing_colour)
    jolt = signal.lfilter(*signal.butter(1, [35, 90], "band", fs=SR), snaps)
    return squeak + snaps * tearing + amp(thud_db) * jolt


def rings(strokes, pulse_db=2.5, bend=0.5, flutter=0.37, uneven=0.15):
    """Friction keeps a blade resonance going; turns bend its pitch and ripple it once and twice a turn."""
    # sustained squeals: (time [s], half length [s], frequency at that time [Hz], glide [Hz per s],
    #  level [dB], left minus right [dB])
    ring_rows = [(2.754, .19, 3790, 0, -32, 17), (6.92, .21, 3760, -100, -37, -6),
                 (6.64, .06, 5150, 0, -52, -5), (7.04, .13, 5170, -450, -37, -7)]
    angle, out = 2 * np.pi * spindle_turns(), np.zeros((2, N))
    ripple_db = pulse_db / 2 * (np.cos(angle) + np.cos(2 * angle))
    ripple = unit(amp(ripple_db) * (1 + uneven * drift(150)))
    sway = bend * np.sin(angle) + flutter * (drift(110) + drift(25))
    for s, half, hz, glide, db, lean_db in ring_rows:
        phase = 2 * np.pi * (hz + glide * (T - s) / 2) * (T - s) + sway
        out += np.sqrt(2) * amp(db) * bell(s, half) * np.sin(phase) * panned(lean_db)
    return out * ripple * sum(touch for touch, _, _ in strokes)


def tool_rest(boom_db=-36.5, strike_s=0.00056, click_s=0.025, room_db=-23, room_s=0.049):
    """The rest booms in the deep cut and rings with the shank when the tool lands; the workshop prolongs it."""
    # resonances of the rest: (frequency [Hz], width [Hz], relative level [dB])
    rest_modes = [(247, 19.6, 1.5), (291.3, 17.5, 5), (327, 46, -12), (413, 22, -10), (607, 26, -22),
                  (810, 75, -21), (1146, 23, -27.5)]
    # resonances of the tool's shank: (frequency [Hz], width [Hz], relative level [dB])
    shank_modes = [(390, 15, -6), (535, 30, 0), (783, 32, 4), (1150, 22, -8)]
    # the tool is set down: (time [s], ring of the rest [dB], click [dB], clank of the shank [dB])
    knocks = [(5.2546, -24.5, -48, -35), (5.286, -37, -57, -48), (7.5469, -27, -42, -32),
              (7.5544, -25, -51, -40), (7.591, -30.5, -64, -43), (7.628, -42, -69, -65)]
    no_rumble = 1 + (170 / (HZ + 1)) ** 6  # dividing by this removes the lowest bass
    modes = ringing(rest_modes) / no_rumble
    boom = steadied(sound(ports(grain(8.5, 0.57)), modes), 0.039)
    out = amp(boom_db + digging()) * contact(DEEP[0][0], DEEP[-1][0]) * boom
    ring = wave(modes) * (1 - np.exp(-T / strike_s)) * (T < 1)
    shank = wave(ringing(shank_modes) / no_rumble) * (T < 1)
    air = ports(rng.standard_normal((2, N)))
    clack_colour = [(200, -40), (400, 14), (650, 5), (900, 6), (1400, 0), (4000, -3), (8000, -45)]  # Hz, dB
    clack = sound(air, amp(read(clack_colour)))
    room = sound(air, np.sqrt(abs(modes)) / (1 + (HZ / 1000) ** 4))
    echo = amp(room_db) * np.exp(-T / room_s) * (1 - np.exp(-T / 0.0055))
    for s, db, click_db, clank_db in knocks:
        at = round(s * SR)
        out[:, at:] += amp(clank_db) * shank[:N - at] / abs(shank).max()
        out[:, at:] += amp(db) * (ring[:N - at] / abs(ring).max() + room[:, at:] * echo[:N - at])
        out[:, at:] += amp(click_db) * clack[:, at:] * np.exp(-T[:N - at] / click_s)
    return out


def groan(flutter=0.32):
    """Two neighbouring multiples of the spindle speed ring the wood and beat once a turn."""
    # groan frequencies as multiples of the spindle speed: (first [times], second [times])
    groan_orders = (9, 10)
    # groans as the shoulder is cut: (time [s], half length [s], level [dB])
    groan_rows = [(6.62, 0.043, -43.5), (6.828, 0.059, -39), (6.92, 0.032, -38.5), (7.055, 0.039, -47)]
    turns, tone = spindle_turns(), np.zeros(N)
    for order in groan_orders:
        phase = 2 * np.pi * order * turns + flutter * drift(30)
        tone += np.sin(phase) * (1 + flutter * drift(25))
    return unit(tone) * sum(amp(db) * bell(s, half) for s, half, db in groan_rows)


def scene():
    """Seven passes of the scraper over the running lathe."""
    # the hand, one curve a pass: (time [s], pressure on the edge [dB], level of the dust fizz [dB])
    bead = [(-0.1, -44, -49), (0.11, -48, -47.5), (0.26, -45, -53), (0.93, -45, -51), (1.05, -45.5, -46.5)]
    cove = [(1.05, -47, -46.5), (1.336, -43, -43), (1.454, -45, -47.5), (1.626, -42, -46), (1.64, -43, -47),
            (2.282, -42.5, -50.5), (2.42, -38.5, -48.5)]
    flank = [(2.42, -33, -47), (2.546, -37.5, -49), (2.678, -36.5, -48.5), (2.84, -37, -50),
             (2.996, -39.5, -54), (3.44, -41.5, -49), (3.55, -41, -50)]
    shoulder = [(5.66, -54, -59), (5.668, -47, -51), (5.768, -54.5, -68), (5.848, -49.5, -62.5),
                (6.164, -48.5, -51.5), (6.614, -41.5, -53.5), (6.814, -36, -54.5), (7.034, -34.5, -47.5),
                (7.088, -35, -48)]
    light_touch = [(8.32, -59, -62), (8.365, -54, -60), (8.42, -48.5, -62), (8.52, -49.5, -59),
                   (8.565, -60, -65)]
    ball = [(8.93, -59, -65), (8.944, -38, -44), (8.988, -55, -56), (9.032, -38.5, -52.5),
            (9.172, -40, -55), (9.36, -39.5, -52.5)]
    strokes = [stroke(rows) for rows in (bead, cove, flank, DEEP, shoulder, light_touch, ball)]
    chatter_hz = 83.8
    bounces = np.cumsum(chatter_hz * (1 + 0.042 * drift(59.95))) / SR  # the blade bounces a little unevenly
    lathe = machine() + frame_hum(strokes)
    scraping = cutting(strokes, bounces) + blade_song(strokes) + chatter(bounces)
    squealing = squeals(strokes, bounces) + rings(strokes)
    return lathe + scraping + squealing + tool_rest() + groan()


def record(dry):
    """Limit the band: a smooth filter removes what lies above 15.9 kHz."""
    lowpass = signal.firwin(511, 15900, window=("kaiser", 9), fs=SR)
    return signal.oaconvolve(dry, lowpass[None], "same")


dry = scene()
out = record(dry)
generate_wav(out)
```